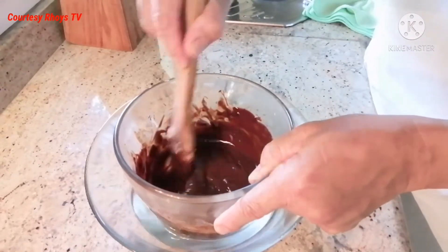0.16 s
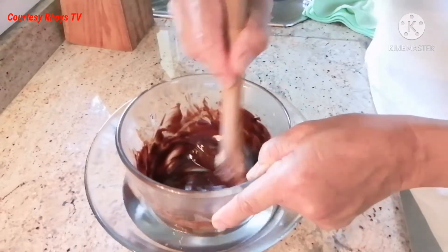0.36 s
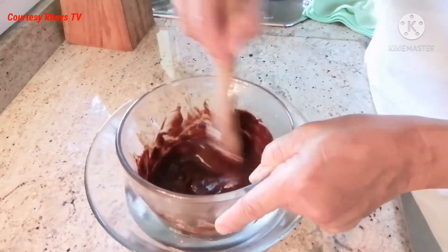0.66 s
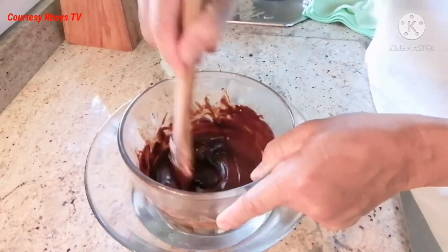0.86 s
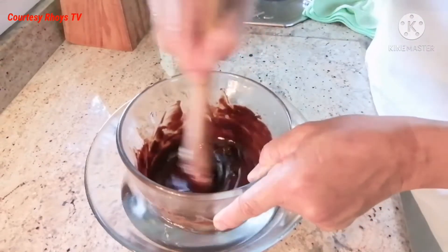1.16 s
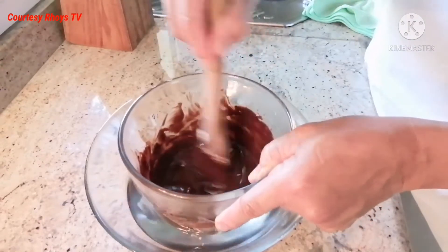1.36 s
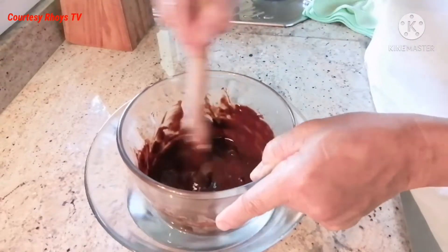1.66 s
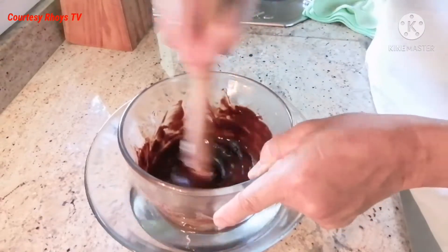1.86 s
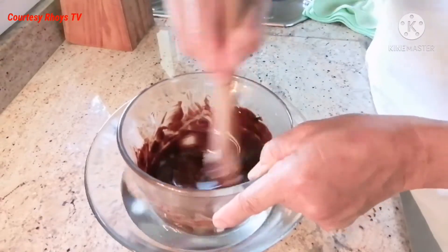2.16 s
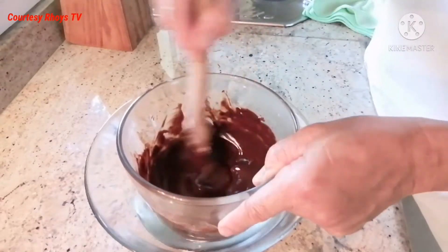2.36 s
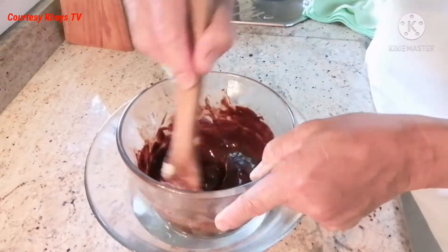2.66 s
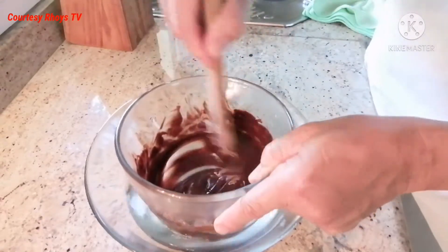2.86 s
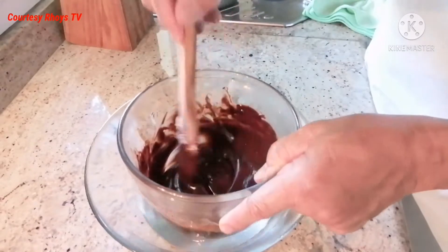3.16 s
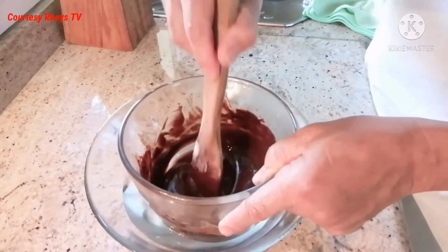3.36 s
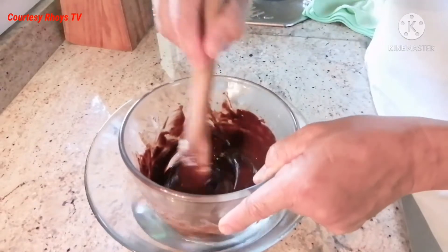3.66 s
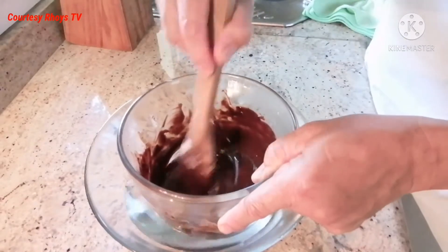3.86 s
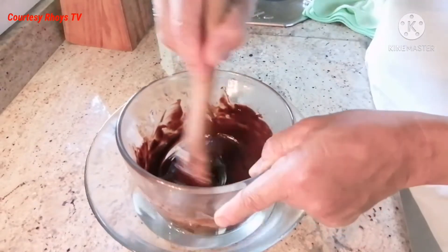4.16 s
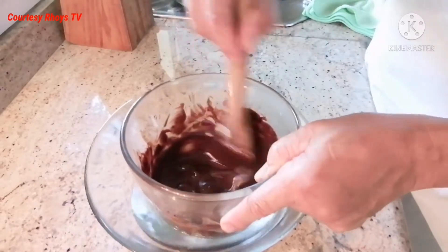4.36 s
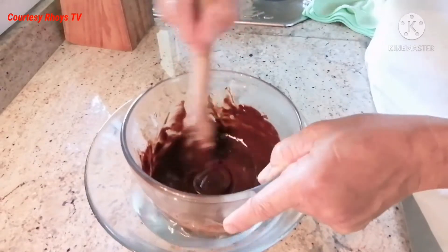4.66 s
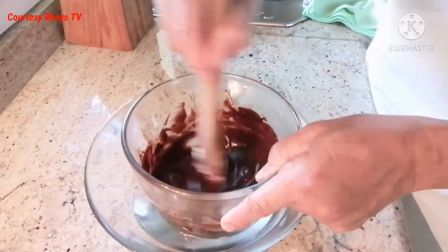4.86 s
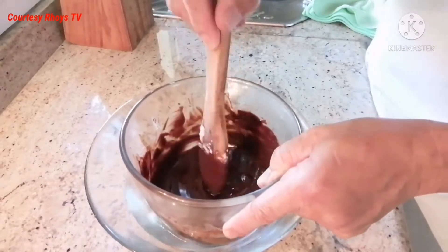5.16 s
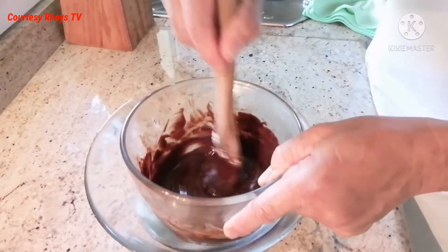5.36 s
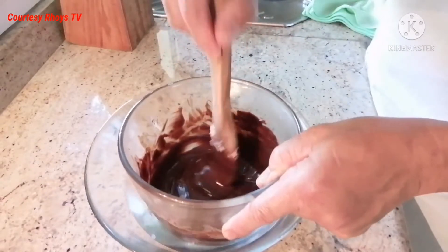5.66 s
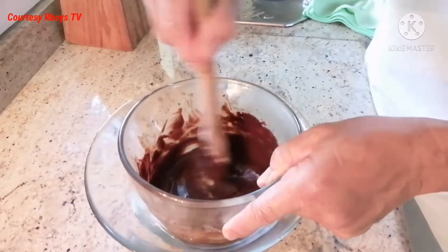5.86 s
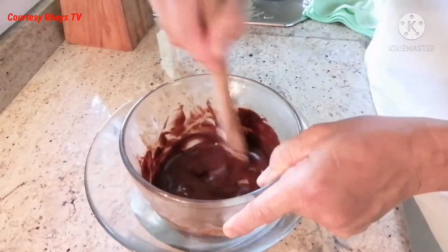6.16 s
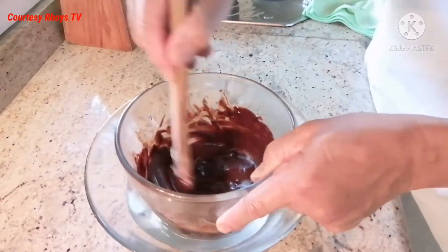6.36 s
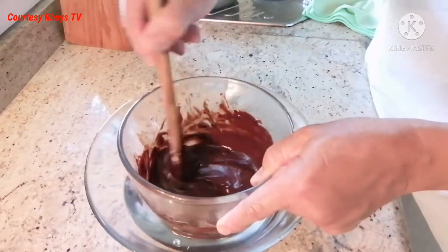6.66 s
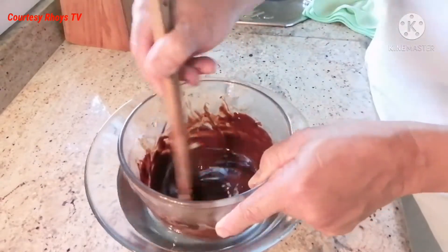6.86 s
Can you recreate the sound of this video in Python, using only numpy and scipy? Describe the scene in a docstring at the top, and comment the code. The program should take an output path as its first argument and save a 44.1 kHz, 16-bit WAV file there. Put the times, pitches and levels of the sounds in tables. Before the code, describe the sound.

A wooden spatula stirs thick melted chocolate in a glass bowl, with soft wet swishes, two sets of three hard knocks, and glassy clinks.

```python
"""A wooden spatula stirs melted chocolate in a glass bowl on a glass plate, close by in a humming kitchen.
A firm knock on the bowl's wall comes first, then swishing, groaning strokes with faint knocks and soft smacks.
Three hard knocks fall on the left wall midway, then, after a light tap on the bowl, three more towards the
right one. These tip the bowl, which drops back on the plate with a clink; a last clink falls at the very end.
Blows are damped modes plus shaped clacks; strokes are grainy noise; the room adds echo, noise and hum."""
import sys
import numpy as np
from scipy import signal
from scipy.fft import rfft, irfft, next_fast_len
from scipy.io import wavfile
from scipy.ndimage import map_coordinates

SR = 44100
rng = np.random.default_rng(int(sys.argv[2]) if len(sys.argv) > 2 else 0)


def unload_wav(signal):
    """Save mono or channel-first audio to the path in sys.argv[1] as 16-bit WAV at rate SR, clipped to [-1, 1]."""
    wavfile.write(
        sys.argv[1],
        SR,
        np.round(np.clip(np.atleast_2d(signal).T, -1, 1) * 32767).astype(np.int16),
    )


N = 308694
T = np.arange(SR) / SR  # s, time within one blow or stroke

# Glass grating on glass, as a spectrum. Each row: frequency in Hz, relative level in dB.
GRATING = [(100, -26), (230, -31), (360, -2.5), (1300, -1.5), (1800, -4.5), (2300, -13.5), (3400, -19.5),
           (5200, -9), (7200, -14.5), (7900, -18), (10000, -28), (15000, -43)]


def amp(db):
    """Decibels to gain."""
    return 10 ** (np.asarray(db) / 20)


def unit(x):
    """Scale to rms 1."""
    return x / np.sqrt(np.mean(x ** 2) + 1e-20)


def along(points, hz):
    """Interpolate (Hz, value) points on a log frequency axis."""
    f, v = np.transpose(points)
    return np.interp(np.log(hz + 1), np.log(f + 1), v)


def curve(rows):
    """Interpolate (s, value) rows to one value per sample."""
    return np.interp(np.arange(N) / SR, *np.transpose(rows))


def wobble(rate):
    """A smooth random curve with rate knots a second."""
    at = np.linspace(0, N, N // 128)
    coarse = map_coordinates(rng.standard_normal(int(N * rate / SR) + 4), [at * rate / SR])
    return np.interp(np.arange(N), at, coarse)


def filtered(x, response):
    """Multiply the spectrum of x by a response of frequency."""
    n = x.shape[-1]
    m = 2 * next_fast_len(n // 2 + SR // 20, True)
    return irfft(rfft(x, m) * response(np.fft.rfftfreq(m, 1 / SR)), m)[..., :n]


def causal(gain):
    """The minimum-phase response with this gain: it starts at once and rings afterwards."""
    cepstrum = irfft(np.log(np.maximum(gain, 1e-6)))
    half = len(cepstrum) // 2
    fold = np.r_[1, np.full(half - 1, 2), 1, np.zeros(half - 1)]
    return np.exp(rfft(cepstrum * fold))


def add(track, s, sound):
    """Mix a sound in at time s."""
    start = max(round(s * SR), 0)
    track[:, start:start + sound.shape[1]] += sound[:, :N - start]


def placed(x, left_db, lag_ms):
    """Make a sound louder and later at the left microphone, half the difference on each side."""
    sides = np.array([[.5], [-.5]])

    def paths(hz):
        delay = np.exp(-2j * np.pi * hz * sides * lag_ms / 1000)
        return amp(sides * left_db) * delay

    return filtered(x, paths)


def knocks():
    """Wood meets the bowl's wall through a cushion of chocolate: wall ring plus the blade's clack."""
    # Spatula on the bowl. Each row: start in seconds, level in dB, contact brightness in Hz,
    # place from 0 (left wall) to 1 (right wall), wall ring in dB.
    blows = [(0.0, -17, 1840, 0.41, -4), (.928, -44, 1200, 1, 2.5), (1.274, -48.5, 1320, 0.89, 6),
             (1.636, -49, 1000, 1, -1), (1.976, -45, 1270, 0.66, 5.5), (2.089, -49.5, 1780, 0.66, 8.5),
             (2.317, -47, 1280, 0.73, 8.5), (3.4976, -14.5, 2740, 0.016, 0.5),
             (3.7363, -16.5, 2160, 0.057, 0), (3.969, -18, 1760, 0.029, 0), (5.448, -12, 2800, 0.78, -2),
             (5.700, -11.5, 2900, 0.96, -6.5), (5.958, -11.5, 2780, 1, -4.5)]
    # Modes of the bowl, damped by chocolate and hand. Each row: frequency in Hz, t60 in seconds,
    # level struck left in dB, level struck right in dB, left minus right in dB; levels before scatter.
    bowl_modes = [(368, .2, -26, -24, 3), (570, .11, -25.5, -20, 6), (640, .04, -32, -17, 8),
                  (733, .08, -16, -4.5, 7), (845, .06, -13, -13, 7), (987, .15, -28, -27, -1),
                  (1130, .08, -26, -28, 3), (1560, .075, -9.5, -26, 4), (1620, .075, -26, -10.5, 3),
                  (2140, .045, -13, -25, 5), (2220, .04, -12, -30, 5), (2340, .045, -16, -32, 5),
                  (2525, .04, -14, -26, 5), (2605, .04, -15, -32, 5), (4990, .05, -22, -24, 5),
                  (5510, .05, -16, -25, 7)]
    # The blade's dull clack, as a spectrum. Each row: frequency in Hz, relative level in dB.
    wood_spectrum = [(100, -42), (300, -61), (480, -2), (720, 6.5), (1400, -1.5), (1900, -4), (2350, -8),
                     (3000, -8), (3800, -21.5), (5200, -7.5), (7000, -3), (9500, -26), (16000, -10)]
    track = np.zeros((2, N))
    for s, db, bright_hz, place, ring_db in blows:
        wall = ring(bowl_modes, place, scatter_db=1, scatter_turn=.45)
        blade = clack(wood_spectrum, t60=.04, scattered=1.1)
        contact = amp(ring_db) * wall + amp(27.0) * placed(blade, left_db=-0.5, lag_ms=0)
        add(track, s, amp(db) * softened(contact, bright_hz, order=3))
    return placed(radiated(track, corner_hz=310), left_db=3.0, lag_ms=0.058)


def ring(modes, place, scatter_db, scatter_turn):
    """Damped modes; the place of contact sets their strengths, and each radiates unevenly to the two sides."""
    hz, t60, first_db, second_db, left_db = np.transpose(modes)
    chance = rng.standard_normal((len(hz), 2, 2))
    db = first_db + np.clip(place, 0, 1) * (second_db - first_db) + np.outer([.5, -.5], left_db)
    # a complex gain holds each mode's level and starting phase at each side
    gain = amp(db + scatter_db * chance[:, 0].T) * np.exp(1j * scatter_turn * chance[:, 1].T)
    phase = np.outer(np.float32(2 * np.pi * hz), np.float32(T))
    decay = np.outer(np.float32(-np.log(1000) / t60), np.float32(T))
    fade = np.exp(np.maximum(decay, -20))
    rise = 1 - np.exp(-(T / .00025) ** 2)
    in_phase = np.float32(gain.real) @ (fade * np.cos(phase))
    quadrature = np.float32(gain.imag) @ (fade * np.sin(phase))
    return (in_phase - quadrature) * rise


def clack(spectrum, t60, scattered):
    """One sharp push, then its dense scatter inside the bowl and off the counter."""
    t = T[:SR // 10]
    scatter = rng.standard_normal((2, len(t))) * amp(-60 * t / t60) * (1 - np.exp(-t / 0.00072))
    push = (t == 0) + scattered * scatter / np.linalg.norm(scatter[0])
    push = push / np.hypot(1, scattered)
    sound = filtered(push, lambda hz: causal(amp(along(spectrum, hz))))
    return np.pad(sound, ((0, 0), (0, len(T) - len(t))))


def softened(x, corner_hz, order):
    """A longer contact weakens the high frequencies."""
    return filtered(x, lambda hz: causal(1 / np.sqrt(1 + (hz / corner_hz) ** (2 * order))))


def radiated(x, corner_hz):
    """A small bowl pushes hardly any air below its lowest mode."""
    return filtered(x, lambda hz: causal(hz ** 3 / (hz ** 3 + corner_hz ** 3)))


def clinks():
    """The tipped bowl lands on the plate and rings freely until it settles and is damped."""
    # The bowl drops on the plate. Each row: start in seconds, level in dB, contact brightness in Hz,
    # place on the foot from 0 to 1, ring in dB, free ringing in seconds.
    drops = [(5.5135, -17.5, 13000, 0, 2.5, .44), (5.532, -19.5, 11000, .3, -12, .1),
             (6.030, -15, 11000, 1, .5, .27), (6.056, -22, 1400, .3, -10, .1),
             (6.982, -13, 12000, .3, -4, .2)]
    # Free ring of the glass, in split pairs. Each row: frequency in Hz, t60 in seconds, level at one side
    # of the foot in dB, level at the other in dB, left minus right in dB; levels before scatter.
    glass_modes = [(350, .25, -21, -22, 2), (395, .28, -24, -23, 5), (750, .2, -31, -29, -1),
                   (958, 1.5, -26.5, -39, -3), (985, 1.1, -27, -37, 4), (1249, .2, -31, -31, -6),
                   (1330, .2, -30, -32, 9), (1716, .24, -13.5, -23, 9), (1746, .85, -29, -16, 5),
                   (2709, .45, -18, -17.5, 3), (3830, .3, -37, -43, 2), (4200, .25, -43, -42, 9),
                   (4808, .22, -27, -49, 12), (4953, .3, -40, -29, 10), (5076, .15, -24, -29, 8),
                   (5533, .18, -21, -28, 10), (6160, .4, -28, -38, 4), (6215, .35, -33, -32, 9),
                   (6880, .2, -44, -37, 3), (7110, .22, -28, -43, -4), (7235, .3, -33, -33, -9),
                   (8420, .16, -29, -50, -12), (8600, .16, -40, -40, -6), (10050, .15, -36, -58, -1),
                   (10230, .15, -58, -43, 0)]
    track = np.zeros((2, N))
    for s, db, bright_hz, place, ring_db, free_s in drops:
        tones = amp(ring_db) * ring(glass_modes, place, scatter_db=1, scatter_turn=.4)
        tones += amp(-27) * shimmer(3600, 15000, t60=.25, count=40)
        tones = off_moving_hand(tones, share=.4, speed=.7)
        settled = amp(-8 * np.clip((T - free_s) / 0.039, 0, 1))  # drops 8 dB within 39 ms
        grate = clack(GRATING, t60=.045, scattered=1.9)
        contact = tones * settled + amp(29.5) * grate
        add(track, s, amp(db) * softened(contact, bright_hz, order=2))
    return placed(radiated(track, corner_hz=243), left_db=2.5, lag_ms=0.13)


def shimmer(low_hz, high_hz, t60, count):
    """A crowd of faint upper partials of bowl and plate; the higher, the shorter."""
    hz = low_hz * (high_hz / low_hz) ** ((np.arange(count) + rng.random(count)) / count)
    db = along(GRATING, hz)
    modes = np.c_[hz, t60 * low_hz / hz, db, db, np.zeros(count)]
    return ring(modes, 0, scatter_db=3, scatter_turn=2)


def off_moving_hand(x, share, speed):
    """The stirring hand, at speed m/s, reflects the ring with a slight Doppler shift, so that it beats."""
    shift = 2 * speed / 343  # 343 m/s is the speed of sound
    delay = .0015  # s
    echo = np.array([np.interp(T * (1 + shift) - delay, T, side, left=0) for side in x])
    return x + share * echo


def stirring():
    """Strokes swish and leave a fading wake of bubbles; pressed along the wall, wood judders and bowl groans."""
    # The blade ploughs through the chocolate. Each row: start in seconds, length in seconds,
    # wet swish in dB, rubbing groan in dB.
    strokes = [(0.32, 0.15, -67.5, -73), (0.755, .14, -70, -69.5), (0.94, 0.067, -67, -53),
               (1.277, 0.065, -63.5, -60), (1.628, .085, -66.5, -54.5), (1.975, .03, -64, -53),
               (2.098, 0.11, -71.5, -70), (2.314, 0.061, -63.5, -53), (2.89, 0.2, -65.5, -77),
               (4.267, .04, -67, -60), (4.991, 0.034, -65.5, -57.5), (5.07, .12, -75, -75),
               (6.204, 0.083, -65.5, -73), (6.57, 0.091, -62.5, -59)]
    # Wet squelch, as a spectrum. Each row: frequency in Hz, relative level in dB per Hz.
    squelch = [(1000, -41.5), (2500, -10.5), (3900, -13), (6500, -6.5), (8500, -16.5), (12000, -18),
               (15000, -14.5)]
    # Rubbing groan, as a spectrum. Each row: frequency in Hz, relative level in dB per Hz.
    groan_spectrum = [(120, -41), (220, -6), (365, 16), (461, -39.5), (560, 5.5), (749, 13), (986, -28),
                      (1310, -30.5), (1570, -17), (1900, -34), (3200, -53)]
    swell_skew = 0.41  # under 1: a stroke swells fast and fades slowly
    wake_db, wake_s = -8.5, 0.32  # bubbles behind a stroke: level re its swish, time to fade by 1/e
    simmer_db = -73  # the steady squelch of the turning mass
    swell = np.zeros((3, N))
    for s, length, swish_db, groan_db in strokes:
        progress = np.clip(T / length, 0, 1)
        push = np.sin(np.pi * progress ** swell_skew)
        trail = progress * np.exp(-T / wake_s)
        levels = [amp(swish_db) * push, amp(groan_db) * push, amp(swish_db + wake_db) * trail]
        add(swell, s, np.array(levels))
    swish_level, groan_level, wake_level = swell
    wake = np.hypot(amp(simmer_db), wake_level) * grains(squelch, rate=1500, smooth=1)
    swish = swish_level * grains(squelch, rate=1500, smooth=0.51)
    groan = groan_level * unit(grains(groan_spectrum, rate=780, smooth=0.61).mean(0))
    return placed(wake + swish + groan, left_db=1.0, lag_ms=0.094)


def grains(spectrum, rate, smooth):
    """Tiny bursts of uneven size, rate a second on average, over a smooth hiss; rms 1."""
    bursts = (rng.random(N) < rate / SR) * rng.standard_normal((2, N)) * amp(1.3 * rng.standard_normal(N))
    fizz = unit(bursts) + smooth * rng.standard_normal((2, N))
    return unit(filtered(fizz, lambda hz: causal(amp(along(spectrum, hz)))))


def smacks():
    """Films of chocolate snap, thin ones brighter; a light touch on the bowl adds a short 1620 Hz ring."""
    # Sticky smacks of the chocolate. Each row: start in seconds, level in dB,
    # strength of the bowl's ring (0 = none), tilt in dB per octave.
    snaps = [(1.098, -53, 0, 13), (2.533, -40.5, 0.019, 0.5), (2.662, -54, 0, 5), (3.2, -54, 0, -2),
             (3.463, -45.5, 0, 0.5), (4.25, -59, 0.13, 22), (4.362, -57, 0, -7), (4.841, -48.5, 0, 6.5),
             (4.996, -52, 0.27, 6), (5.1716, -35.5, 1.45, -5), (5.9295, -60.5, 0.18, 24),
             (6.174, -45.5, 0.35, -11), (6.783, -52.5, 0.1, 21)]
    # One snapping film, as a spectrum. Each row: frequency in Hz, relative level in dB before the tilt.
    film_spectrum = [(300, -49), (900, -52), (1400, -30), (2300, 9), (3800, -1), (6800, 12), (9000, -1),
                     (12000, -5.5), (15000, 1.5)]
    track = np.zeros((2, N))
    bowl_ring = np.sin(2 * np.pi * 1620 * T) * amp(-60 * T / 0.035)
    for s, db, ring_share, tilt_db in snaps:
        tilted = [(hz, level + tilt_db * np.log2(hz / 7000)) for hz, level in film_spectrum]
        snap = clack(tilted, t60=.02, scattered=1.5)
        add(track, s, amp(db) * (amp(10.5) * snap + ring_share * bowl_ring))
    return placed(track, left_db=3.0, lag_ms=0.033)


def kitchen(x):
    """Hard walls answer within milliseconds; treble dies first, and the echoes drift as the hands move."""
    # Echo of the room. Each row: frequency in Hz, t60 in seconds.
    echo_times = [(200, 1), (800, 0.41), (2200, 0.47), (5000, 0.47), (12000, 0.089)]
    drift_hz = 1.1  # how fast the moving hands change the paths to the walls
    # two echo patterns for two microphones, each band of noise fading at its own rate
    hz, t, z = signal.stft(rng.standard_normal((2, 2, SR)), SR, nperseg=256)
    fading = z * amp(-60 * t / along(echo_times, hz)[:, None])
    tails = signal.istft(fading, SR)[1][..., :SR] * (1 - np.exp(-T / 0.0053))
    tails = tails / np.linalg.norm(tails[0, 0])
    turn = 2 * np.pi * drift_hz * np.arange(N) / SR
    feeds = x.mean(0) * np.array([[np.cos(turn)], [np.sin(turn)]])
    return signal.fftconvolve(feeds, tails, axes=2).sum(0)[:, :N]


def background():
    """Room noise, alike at both microphones in the bass, and an appliance's wavering hum."""
    # Room noise, as a spectrum. Each row: frequency in Hz, relative level in dB per Hz.
    air_spectrum = [(15, -43), (25, -30.5), (43, 2.5), (75, -8.5), (139, -2), (398, -17), (429, -11),
                    (461, -19), (619, -14.5), (666, -18), (851, -19), (916, -21), (1780, -26.5),
                    (3100, -29), (3990, -41), (8730, -48), (11300, -47), (19200, -120)]
    # Likeness of the two sides. Each row: frequency in Hz, left-right likeness from 0 to 1.
    likeness = [(60, 0.93), (150, 0.95), (300, 0.67), (800, 0.13), (3000, 0.083), (12000, 0.047)]
    # The room's low rumble. Each row: time in seconds, level in dB before the lift below.
    rumble_level = [(0.0, -56), (1.44, -56), (2.26, -58.5), (3.47, -61), (7.0, -54)]
    # Appliance hum. Each row: frequency in Hz, mean level in dB rms before placing.
    hum_tones = [(49.5, -62), (100, -67), (134, -66), (436, -75.5), (872, -78.5), (1739, -81)]
    rumble_lift_db, hiss_db = 1.5, -56

    def mid_and_side(hz):
        turn = np.arccos(np.clip(along(likeness, hz), -1, 1)) / 2
        return amp(along(air_spectrum, hz)) * [np.cos(turn), np.sin(turn)]

    mid, side = filtered(rng.standard_normal((2, N)), mid_and_side)
    air = unit(np.array([mid + side, mid - side]))
    rumble = filtered(air, lambda hz: 1 / (1 + (hz / 400) ** 2))
    hiss = air - rumble
    noise = amp(hiss_db) * hiss + amp(curve(rumble_level) + rumble_lift_db) * rumble
    t = np.arange(N) / SR
    hum = np.zeros(N)
    for hz, db in hum_tones:
        tone = unit(np.sin(2 * np.pi * hz * t + .5 * wobble(3.814)))
        hum += amp(db + 0.25 * wobble(1.4)) * tone
    return placed(noise + hum, left_db=3, lag_ms=.07)


def scene():
    """The bowl close by, with the kitchen round it."""
    wood = knocks()
    glass = clinks()
    chocolate = smacks() + stirring()
    walls = kitchen(amp(-12.5) * wood + amp(-15) * glass + amp(-14) * chocolate)
    return wood + glass + chocolate + walls + background()


def record(dry):
    """The camera keeps nothing above its band limit of 15.8 kHz."""
    return filtered(dry, lambda hz: hz < 15800)


dry = scene()
out = record(dry)
unload_wav(out)
```